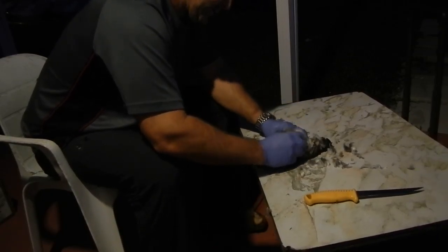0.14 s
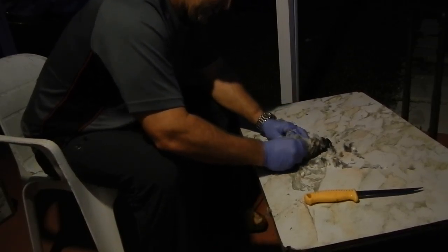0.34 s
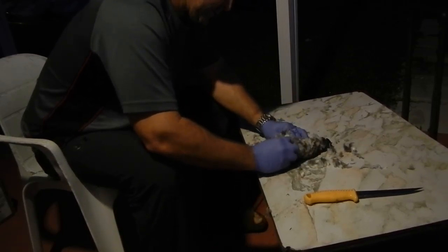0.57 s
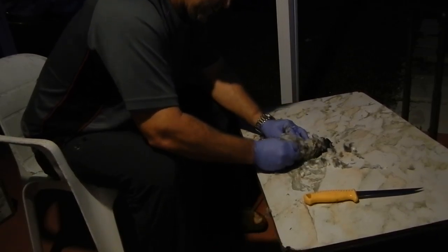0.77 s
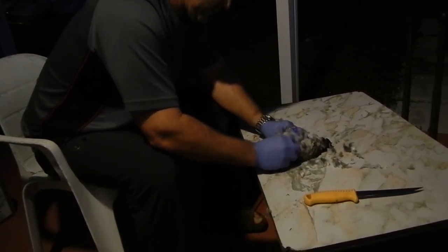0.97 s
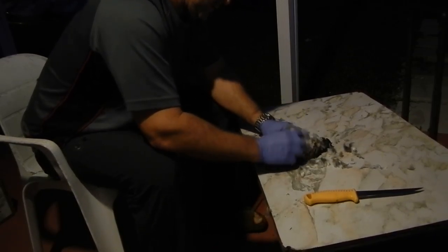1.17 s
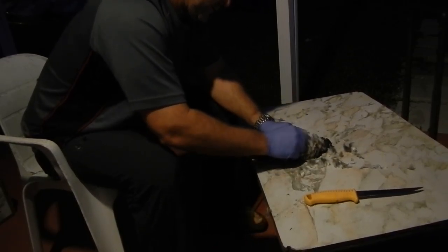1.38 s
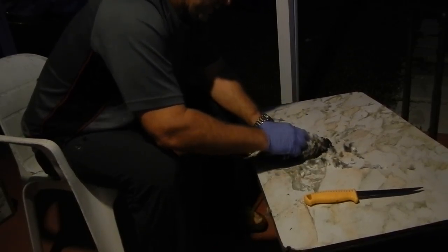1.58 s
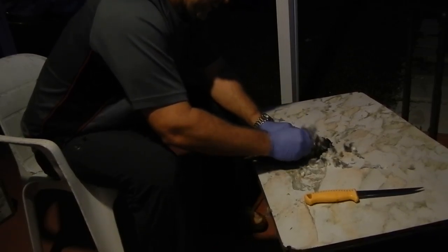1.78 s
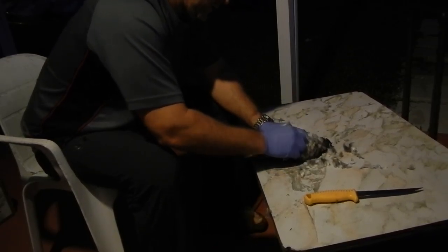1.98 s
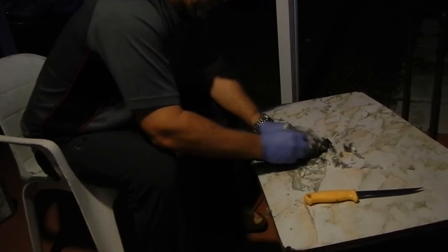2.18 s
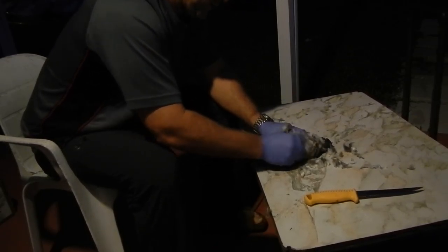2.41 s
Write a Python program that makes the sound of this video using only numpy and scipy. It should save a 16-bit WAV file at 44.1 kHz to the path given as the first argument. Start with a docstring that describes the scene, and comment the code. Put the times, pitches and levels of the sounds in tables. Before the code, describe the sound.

Two quick, crisp rips of feathers being plucked, with faint rustling over a low room rumble.

```python
"""Two tufts of feathers rip out as gloved hands pluck a duck at a table indoors. Each rip is a dense,
swelling run of tiny snaps that rings high while the skin is taut, then drops in pitch as it lets go.
The hands add dull taps and one faint glove slide; the room and a far wall answer rips and hands.
The fingers rustle in the feathers, over a bed of low steady rumble, a hum and a thin whine."""
import sys
import numpy as np
from scipy import signal
from scipy.fft import rfft, irfft, next_fast_len
from scipy.io import wavfile
from scipy.ndimage import map_coordinates

SR = 44100
rng = np.random.default_rng(int(sys.argv[2]) if len(sys.argv) > 2 else 0)


def dump(signal):
    """Clip the signal to [-1, 1] and save it as 16-bit WAV at the path in sys.argv[1]."""
    limited = np.clip(np.atleast_2d(signal).T, -1, 1)
    pcm = np.round(limited * 32767).astype(np.int16)
    wavfile.write(sys.argv[1], SR, pcm)


N = 107780
T = np.arange(N) / SR
ATTACK_S, RELEASE_S = 0.0082, 0.0043  # edges of a rip
SNAPS_PER_S = 2000
SPLIT = np.array([[.5], [-.5]])  # shares a left-minus-right difference between the channels

# Rip cues: start_s, taut_s, level_db, swell_db, slack_level_db, slack_s
RIP_CUES = [(0.674, 0.037, -22, 6, -23, 0.028), (1.759, .035, -21.5, 2.5, -23, 0.022)]
# Ring of the taut skin, one curve per rip: frequency_hz, gain_db
TUFT_COLOURS = [
    [(1000, -21.5), (1900, -52), (2600, -21), (3300, -18), (3850, -4.5), (4160, 3.5), (4360, 0),
     (4650, -13), (4950, -9), (5150, 1.5), (5550, -7), (5800, -17), (6200, -18), (7700, -27.5),
     (8300, -15.5), (9400, -5.5), (10600, -12.5), (11700, -36), (13300, -16), (15500, -31)],
    [(1000, -45), (1900, -38), (2700, -21), (3700, -14.5), (4200, -1), (4500, 5), (4800, -13), (5200, -8.5),
     (5850, -0.5), (6200, -19.5), (6700, -37), (7600, -22.5), (9100, -12.5), (10500, -18), (12000, -22.5),
     (13700, -21), (15500, -38)],
]
# Stereo tilt of the rips: frequency_hz, left_minus_right_db
RIP_BALANCE = [(2000, 0.8), (4500, -0.8), (7000, -.5), (9500, 1.3), (14000, -1)]
def rips():
    """Each tuft tears out in two overlapping layers: the taut stretch, then the slack release."""
    overlap_s, left_lag_s = 0.0045, 5e-6
    tears = 0
    for (start, taut_s, db, swell_db, slack_db, slack_s), colour in zip(RIP_CUES, TUFT_COLOURS):
        tears += taut_skin(start, taut_s, db, swell_db, colour)
        tears += slack_skin(start + taut_s - overlap_s, slack_s, slack_db)
    return place(tears, RIP_BALANCE, lambda hz: -2 * np.pi * hz * left_lag_s)


# Stereo focus of the taut snaps: frequency_hz, left_right_correlation
RIP_FOCUS = [(3000, 0.69), (4500, 1), (5500, 0.62), (9000, 0.6), (14000, 0.82)]
def taut_skin(start, length, db, swell_db, colour):
    """Quills snap out of the taut skin, louder as the pull grows."""
    t = T - start
    swell = amp(db + swell_db * np.clip(t / length - 1, -1, 0))
    attack = 1 / (1 + np.exp(np.clip(2 - 4 * t / ATTACK_S, -50, 50)))
    release = np.exp(-np.maximum(t - length, 0) / RELEASE_S)
    slip = amp(db - 29) * np.exp(-(t / 0.013) ** 2)  # the fingers slip a little before the rip
    hair_db = -2.5
    drives = [snaps(SNAPS_PER_S) + amp(hair_db) * rng.standard_normal(N) for _ in range(2)]
    ringing = np.array([ring(drive, colour) for drive in drives])
    return (swell * attack * release + slip) * widen(ringing, RIP_FOCUS)


def slack_skin(start, length, db):
    """The last feathers come free, their snaps sinking in pitch as the skin loosens."""
    tight_hz, loose_hz, sag_s, scatter = 4280, 2610, 0.018, .21
    grains_per_s, t60_cycles, fade_db_per_s = 2200, 15.7, 305
    count = int(grains_per_s * length * 2)
    onset_s = (np.arange(count) + rng.random(count)) / grains_per_s
    pitch_hz = loose_hz + (tight_hz - loose_hz) * np.exp(-onset_s / sag_s)
    pitch_hz *= np.exp(scatter * jitter(count))
    samples = np.arange(SR // 100)
    cycles = pitch_hz[:, None] * samples / SR
    grains = np.sin(2 * np.pi * cycles) * amp(-60 * cycles / t60_cycles) * (1 - np.exp(-cycles))
    slots = ((start + onset_s) * SR).astype(int)[:, None] + samples
    crackle = np.bincount(slots.ravel(), grains.ravel(), N)[:N]
    crackle = unit(crackle) * np.sqrt(2 * length * SR / N)  # rms near 1 while it sounds
    fizz = amp(-12.5) * unit(ring(snaps(SNAPS_PER_S), FEATHER_COLOUR))
    t = np.maximum(T - start, 0)
    envelope = np.clip(t / ATTACK_S, 0, 1) * amp(db - fade_db_per_s * t)
    release = np.exp(-np.maximum(t - length, 0) / (2 * RELEASE_S))
    return (crackle + fizz) * envelope * release


# Knocks and ticks: start_s, level_db, pitch_hz, t60_s
TAP_CUES = [(.494, -31.5, 580, 0.055), (.493, -46, 2400, .02), (1.115, -38, 2370, .025),
            (1.269, -41, 2400, 0.029), (1.738, -42, 2300, .025), (2.416, -42, 2410, 0.028)]
def hand_taps():
    """The working hands knock and tick: short, damped bursts of resonant noise."""
    rise_s = 0.0021
    taps = 0
    for start, db, hz, t60 in TAP_CUES:
        t = np.maximum(T - start, 0)
        taps += noise_band(hz, width=0.48) * np.minimum(t / rise_s, 1) * amp(db - 60 * t / t60)
    return taps


# Path of the slide: time_s, level_db, pitch_hz
SLIDE_PATH = [(1.25, -74, 2430), (1.32, -53, 2284), (1.39, -61, 2160), (1.46, -79, 2000)]
def glove_slide():
    """A glove slides faintly: a narrow band of noise gliding down."""
    times, db, hz = np.transpose(SLIDE_PATH)
    roughness = wobble(650) + 1j * wobble(650)
    phase = 2 * np.pi * np.cumsum(np.interp(T, times, hz)) / SR
    rub = unit(np.real(roughness * np.exp(1j * phase)))
    return rub * np.interp(T, times, amp(db), left=0, right=0)


# Fader moves of the rustle: time_s, feather_level_db, down_level_db
RUSTLE_LEVELS = [(0, -60.5, -62), (.27, -56.5, -62.5), (.48, -59, -63.5), (.58, -63.5, -65),
                 (.85, -57.5, -59), (1.05, -55, -56), (1.27, -55, -56.5), (1.36, -61.5, -62),
                 (1.48, -59, -64.5), (1.6, -51.5, -61), (1.73, -56.5, -65), (2.0, -58, -66),
                 (2.13, -75.5, -67.5), (2.301, -67, -61.5), (2.44, -56, -58)]
# Broad brush of feathers, also the fizz of the slack skin: frequency_hz, gain_db
FEATHER_COLOUR = [(800, -1.5), (2000, 0), (4000, -0.5), (6300, -1.5), (8000, -3.5), (10000, -16),
                  (11500, -28), (15000, -53)]
# Airy top of the fine down: frequency_hz, gain_db
DOWN_COLOUR = [(5000, -25), (8000, -13), (10000, 0.5), (11500, -10), (13500, -8), (15000, -22)]
def feather_rustle():
    """Soft grains of feathers and fine down brushing the gloves."""
    times, *levels = np.transpose(RUSTLE_LEVELS)
    flutter_db = wobble(30.54)
    rustle = 0
    for db, colour in zip(levels, (FEATHER_COLOUR, DOWN_COLOUR)):
        grains = np.array([snaps(3300, spread_db=4.5) for _ in range(2)])
        rustle += diffuse(grains, colour) * amp(np.interp(T, times, db) + flutter_db)
    return rustle


# Decay of the room: frequency_hz, t60_s
ROOM_DECAY = [(300, 0.14), (2000, 0.39), (4300, 0.47), (6000, 0.38), (9500, 0.38), (14000, 0.35)]
def room(x):
    """Near surfaces echo at once; the diffuse tail dies at its own speed in each band."""
    tail_db, build_s, walls_db, reflections = -8, 0.0076, -8.5, 8
    hz, t, noise = signal.stft(rng.standard_normal((2, SR // 2)), SR, nperseg=256)
    envelope = amp(-60 * t / along(ROOM_DECAY, hz)[:, None]) * (1 - np.exp(-t / build_s))
    tail = signal.istft(noise * envelope, SR, nperseg=256)[1]
    tail *= amp(tail_db) / np.linalg.norm(tail[0])
    for side in tail:
        arrivals = (rng.uniform(.002, .025, reflections) * SR).astype(int)
        side[arrivals] += amp(walls_db) * rng.choice([-1, 1], reflections) / np.sqrt(reflections)
    return signal.fftconvolve(x, tail, axes=1)[:, :N]


def far_wall(x, delay_s=0.11, level_db=-21, cutoff_hz=7500):
    """One dull slap comes back from a far wall."""
    echo = filtered(x, lambda hz: np.exp(-2j * np.pi * hz * delay_s) / (1 + (hz / cutoff_hz) ** 4))
    return amp(level_db) * echo


# Tone of the rumble: frequency_hz, gain_db
RUMBLE_COLOUR = [(20, -23), (32, -13), (62, 1), (85, -2.5), (130, -2.5), (165, -3), (200, -7), (270, -7.5),
                 (410, -12.5), (630, -9.5), (850, -14.5), (1130, -14.5), (1350, -19.5), (1900, -21),
                 (2500, -30), (3300, -31), (5000, -33.5), (8000, -39.5), (14000, -45.5)]
# Stereo tilt of rumble and hum: frequency_hz, left_minus_right_db
BED_BALANCE = [(30, 2), (80, 6), (170, 2), (350, 2.5), (700, 1), (2000, 0), (10000, -2)]
# Stereo phase of rumble and hum: frequency_hz, left_lead_rad
BED_PHASE = [(30, -0.42), (1200, -0.13), (7000, -0.061), (14000, 0)]
def low_bed(rumble_db=-41, hum_db=-54, hum_hz=116.8):
    """Steady rumble with a wavering hum, the lows leaning left."""
    rumble = amp(rumble_db) * diffuse(rng.standard_normal((2, N)), RUMBLE_COLOUR)
    hum_peak = amp(hum_db + 1.25 * wobble(3.8)) * np.sqrt(2)
    hum = hum_peak * np.sin(2 * np.pi * hum_hz * T + 0.29 * wobble(5.32))
    return place(rumble + hum, BED_BALANCE, lambda hz: along(BED_PHASE, hz))


def whine(pitch_hz=14835.5, level_db=-57.5, pan_db=2):
    """A thin electrical whine, a little to the left."""
    phase = 2 * np.pi * pitch_hz * T + np.array([[0], [.7]]) + .1 * wobble(8)
    return amp(level_db + pan_db * SPLIT) * np.sqrt(2) * np.sin(phase)


# Stereo focus of rustle and rumble: frequency_hz, left_right_correlation
DIFFUSE_FOCUS = [(30, 0.74), (100, 0.93), (300, 0.84), (700, 0.87), (1300, 0.74), (3000, 0.49),
                 (10000, 0.25)]
def diffuse(pair, colour):
    """A coloured, diffuse stereo sound of rms 1."""
    return widen(filtered(pair, lambda hz: amp(along(colour, hz))), DIFFUSE_FOCUS)


def widen(pair, focus):
    """Two unrelated signals become left and right with the given correlation, rms 1."""
    angle = lambda hz: np.arccos(np.clip(along(focus, hz), -1, 1)) / 2
    mid, side = filtered(pair, lambda hz: np.array([np.cos(angle(hz)), np.sin(angle(hz))]))
    return unit(np.array([mid + side, mid - side]))


def place(x, balance, left_lead_rad):
    """Pan each frequency by level and phase."""
    return filtered(x, lambda hz: (amp(along(balance, hz)) * np.exp(1j * left_lead_rad(hz))) ** SPLIT)


def snaps(per_s, spread_db=0):
    """Irregular clicks, their sizes scattered by spread_db, rms 1."""
    count = int(per_s * N / SR)
    onsets = ((np.arange(count) + 2 * rng.random(count)) * SR / per_s).astype(int)
    sizes = amp(spread_db * jitter(count)) * rng.choice([-1, 1], count)
    return unit(np.bincount(onsets, sizes, N)[:N])


def ring(x, colour):
    """x rings a causal (minimum-phase) body of the given colour."""
    size = 2048
    cepstrum = irfft(np.log(amp(along(colour, np.fft.rfftfreq(size, 1 / SR)))))
    cepstrum[1:size // 2] *= 2
    cepstrum[size // 2 + 1:] = 0
    return signal.fftconvolve(x, irfft(np.exp(rfft(cepstrum))))[:N]


def noise_band(centre_hz, width):
    """Noise in one resonance, its width a share of the centre."""
    def resonance(hz):
        damping = 1j * hz * width * centre_hz
        return (damping / (centre_hz ** 2 - hz ** 2 + damping)) ** 2
    return unit(filtered(rng.standard_normal(N), resonance))


def filtered(x, response):
    """Shape x with a frequency response."""
    size = next_fast_len(N + SR // 2)
    return irfft(rfft(x, size) * response(np.fft.rfftfreq(size, 1 / SR)), size)[..., :N]


def along(curve, hz):
    """Read a curve on a log frequency axis."""
    points_hz, values = np.transpose(curve)
    return np.interp(np.log(hz + 1), np.log(points_hz + 1), values)


def wobble(knots_per_s):
    """A smooth random curve."""
    return map_coordinates(rng.standard_normal(int(N * knots_per_s / SR) + 4), [T * knots_per_s])


def jitter(count):
    """Normal draws held within two deviations."""
    return np.clip(rng.standard_normal(count), -2, 2)


def amp(db):
    """Decibels to gain."""
    return 10 ** (np.asarray(db) / 20)


def unit(x):
    """Scale to rms 1."""
    return x / np.sqrt(np.mean(x ** 2) + 1e-20)


def scene():
    """Rips and hands feed the room; the rustle and the background stay dry."""
    work = rips() + hand_taps() + glove_slide()
    return work + far_wall(work) + room(work) + feather_rustle() + low_bed() + whine()


def record(dry, cutoff_hz=15500):
    """A brick-wall high cut on the whole mix."""
    return filtered(dry, lambda hz: hz < cutoff_hz)


dry = scene()
out = record(dry)
dump(out)
```